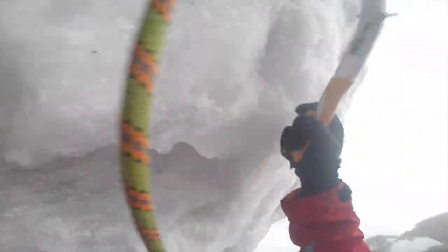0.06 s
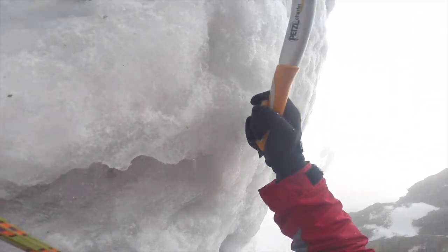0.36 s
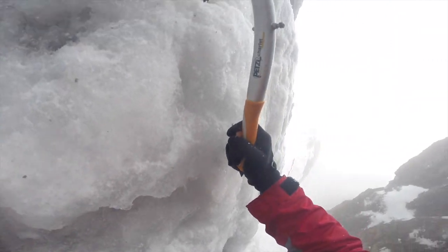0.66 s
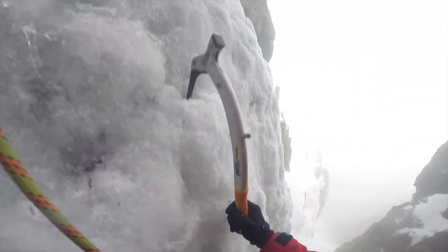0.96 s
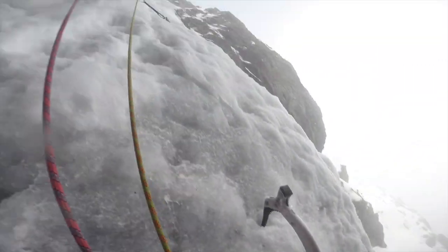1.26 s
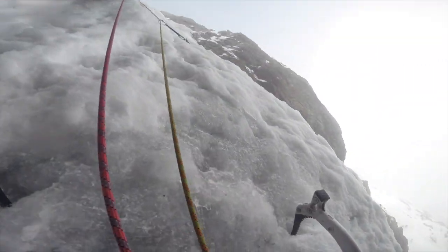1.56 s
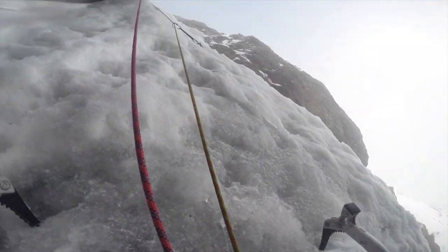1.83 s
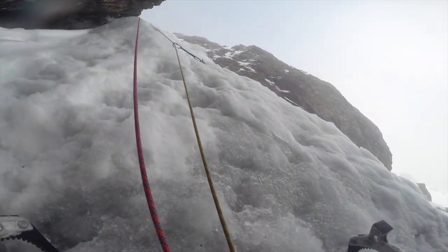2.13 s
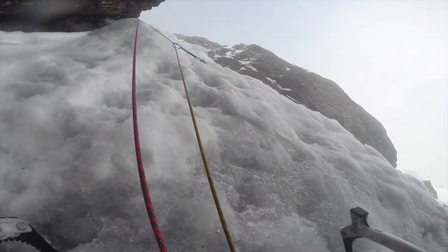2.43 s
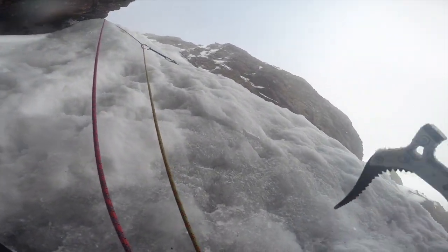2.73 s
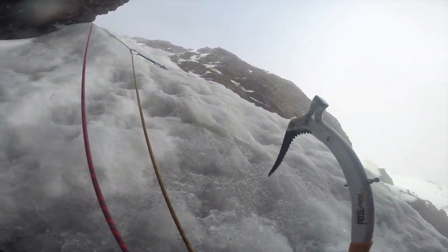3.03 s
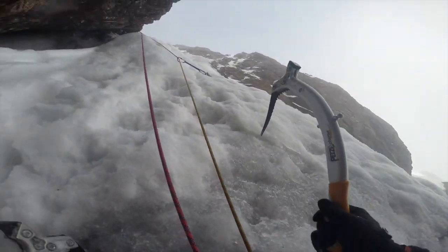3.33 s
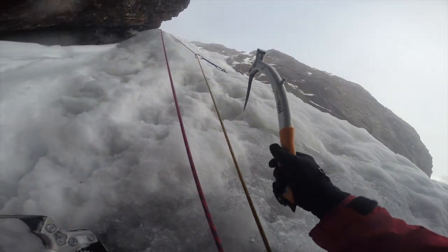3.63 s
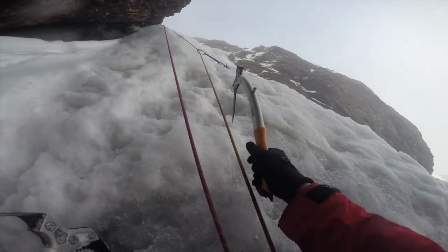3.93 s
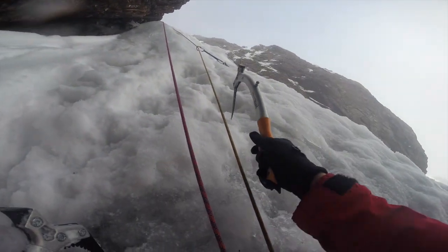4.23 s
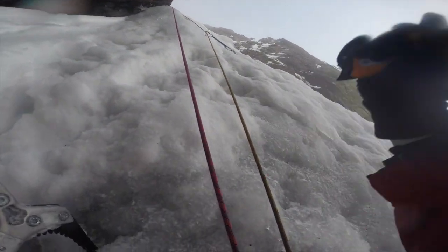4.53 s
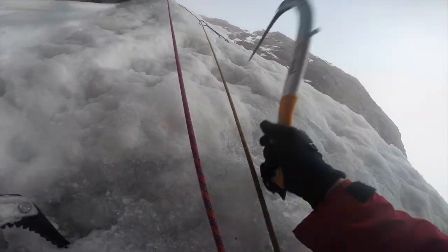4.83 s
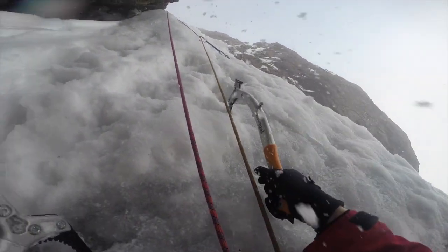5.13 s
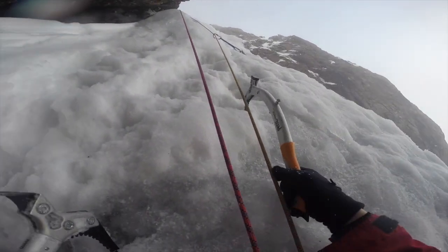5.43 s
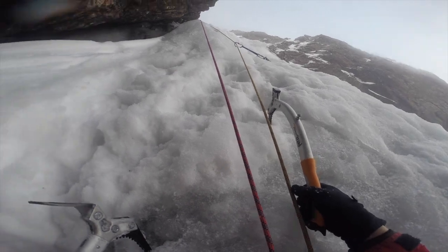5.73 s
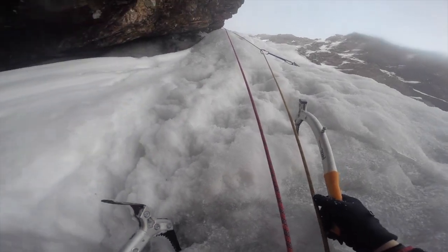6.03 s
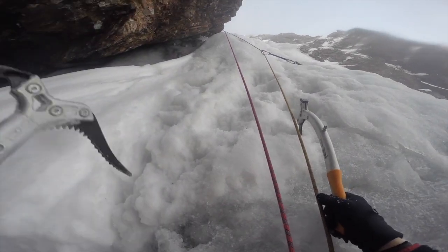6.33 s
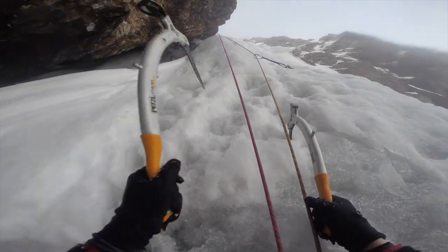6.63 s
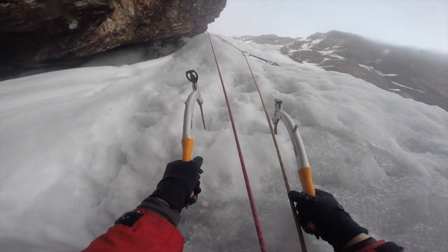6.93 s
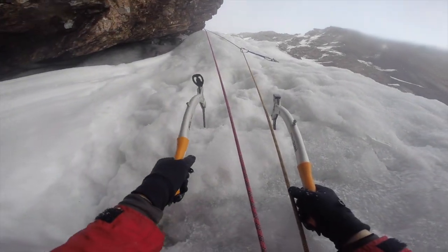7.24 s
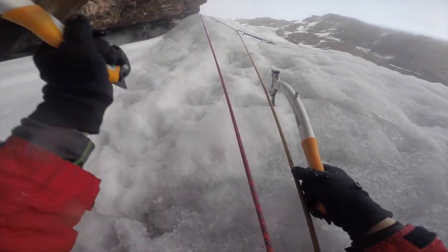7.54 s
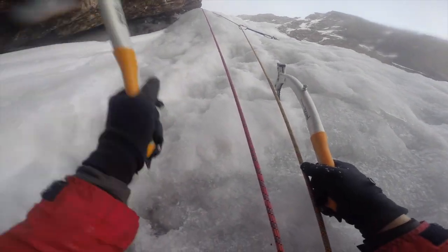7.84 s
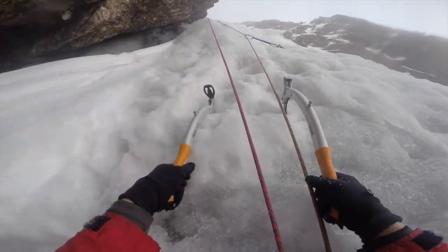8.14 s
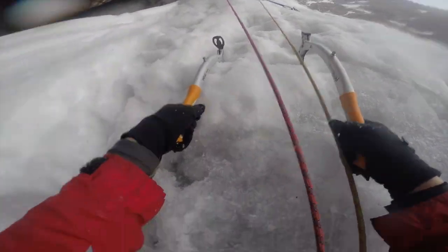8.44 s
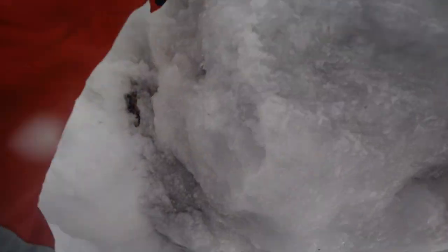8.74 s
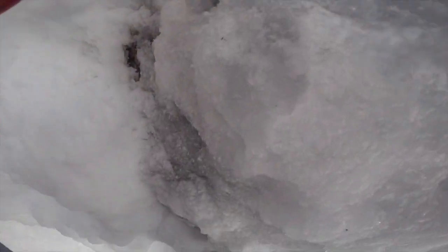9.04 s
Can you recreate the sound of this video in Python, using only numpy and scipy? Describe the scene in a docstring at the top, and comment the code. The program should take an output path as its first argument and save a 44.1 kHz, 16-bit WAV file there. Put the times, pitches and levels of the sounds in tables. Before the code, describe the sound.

An ice climber is heard from a helmet microphone. A loud, deep thump and rustle come first, followed by quieter knocks, rubbing clothes and small metal clinks. An axe pick crunches into the ice, and flying chips crack sharply against the microphone's plastic case. Two more axe strikes follow, the second firmer, with faint sleeve swishes. Low wind rumbles in the open air throughout.

```python
"""First comes a loud thump and rustle, then quieter knocks: an ice climber, heard from a helmet camera.
Axe picks crunch into the wall, and about five seconds in, chips of ice fly back and crack against the
camera's plastic case. The climber's moves knock the camera and sway its mount. Metal gear clinks,
clothes rub and wind rumbles. The camera's automatic volume control starts low and recovers,
then turns everything down again for a moment when the chips hit."""
import sys
import numpy as np
from scipy import signal
from scipy.fft import rfft, irfft
from scipy.io import wavfile

SR = 44100
rng = np.random.default_rng(int(sys.argv[2]) if len(sys.argv) > 2 else 0)


def inscribe(sig):
    """Save sig as 16-bit PCM at rate SR to the path in sys.argv[1].

    A 1-D sig is mono; a 2-D sig holds one channel per row.
    Samples are clipped to [-1, 1] before scaling.
    """
    pcm = np.round(np.clip(np.atleast_2d(sig).T, -1, 1) * 32767)
    wavfile.write(sys.argv[1], SR, pcm.astype(np.int16))


N = 409248

# jolts that sway the camera or boom the helmet: start_s, level_db, pitch_hz, fade_s (to fall 60 dB)
JOLTS = [(0.001, 15, 54, 0.072), (0.029, -10, 120.3, 0.27), (0.037, 6.5, 62, 0.1), (1.376, -16, 28, 0.3),
         (1.418, -11.5, 68, 0.45), (1.466, -6.5, 46.7, 0.21), (1.528, -12.5, 58.6, 0.33),
         (2.31, -26, 65.6, 0.35), (4.37, -34, 70, 0.16), (4.938, -23, 61.4, 0.15),
         (4.965, -19.5, 46.2, 0.18), (6.81, -30, 69.3, .2), (7.978, -18, 30, 0.19),
         (8.015, -22.5, 48.55, 0.27), (8.548, -24, 50.7, 0.17), (8.579, -17, 62, 0.18)]


def axe_picks():
    """Each swing crunches twice, through the crust and then deeper in; between swings the pick scrapes."""
    # swings: start_s, entry_db, entry_s, brightness_hz, sinking_db, sinking_s
    bites = [(4.01, -48, 0.019, 6760, -48.5, .016), (4.917, -22, 0.0095, 5280, -25, .007),
             (6.895, -41, 0.02, 7200, -38.5, 0.028), (7.9392, -31, 0.021, 8500, -26, 0.024)]
    # the pick dragging lightly on the ice: start_s, level_db, length_s
    scrapes = [(4.242, -48.5, 0.077), (6.942, -52.5, 0.054), (7.102, -55, .09), (7.261, -62, 0.074)]
    out = np.zeros(N)
    for start_s, entry_db, entry_s, brightness_hz, sinking_db, sinking_s in bites:
        add(out, start_s, crunch(entry_db, entry_s, brightness_hz))
        add(out, start_s + entry_s, crunch(sinking_db, sinking_s, 0.64 * brightness_hz))  # duller inside
    for start_s, level_db, length_s in scrapes:
        add(out, start_s, crunch(level_db, length_s, brightness_hz=5900))
    return out


def crunch(level_db, length_s, brightness_hz):
    """The pick breaks the ice in a rush of tiny cracks, which dies away once it has stuck."""
    # ringing tones that colour the crunch: pitch_hz, width_hz, level_db
    pick_tones = [(776, 100, -2), (1440, 74, 10.5), (2260, 550, 5.5), (2780, 370, 1.5), (4395, 680, 2.5),
                  (5800, 187, 1.5), (7100, 280, -21.5), (10900, 4000, -16)]
    t = np.arange(SR // 4) / SR
    driving = np.minimum(t / 0.0012, 1) * np.exp(-np.maximum(t - 0.68 * length_s, 0) / 0.0055)
    settling = gain_of(-25) * np.exp(-t / 0.05)
    cracks = rng.standard_normal(len(t)) * random_sizes(len(t), spread_db=5.1)
    push = cut_bass(cut_treble(cracks * (driving + settling), brightness_hz), 650)
    return at_level(ring_body(push, pick_tones, leak_db=-29), level_db)


def ice_chips():
    """Each chip cracks on the case and rings for an instant; fine ice dust ticks in between."""
    # chips landing: start_s, level_db, hardness_hz, crumble_s, ring_hz, ring_db (against the case)
    hits = [(5.153, -43, 5000, 0.0086, 2560, 10), (5.1759, -27, 9000, 0.0012, 1850, -9),
            (5.2086, -9.5, 12000, 0.0015, 6500, -5.5), (5.237, -40, 10000, 0.002, 5550, -15.5),
            (5.2608, -6, 10000, 0.0023, 4510, 11), (5.265, -8.5, 2600, 0.0066, 2050, -2),
            (5.291, -26, 5000, 0.0079, 2090, -4), (5.3072, -17.5, 12000, 0.0025, 5630, -2),
            (5.317, -9.5, 3800, 0.0054, 2130, 2.5), (5.34, -31, 4500, 0.012, 2050, 11),
            (5.376, -9, 2000, 0.0015, 2010, 2.5), (5.381, -20.5, 1700, 0.0041, 2000, 6),
            (5.4045, -40, 14000, 0.0015, 9500, -5), (5.489, -48, 3500, 0.0037, 2900, -5),
            (5.513, -38.5, 7000, 0.0044, 2920, 3), (5.535, -46.5, 3500, 0.003, 2020, 6)]
    # ringing tones of the plastic case: pitch_hz, width_hz, level_db
    case_tones = [(1300, 110, -13.5), (1580, 140, 9), (1830, 160, 1.5), (2020, 110, -6.5), (2670, 48, -1.5),
                  (2880, 170, -0.5), (3230, 220, -1), (4400, 750, -4), (5300, 160, -8.5), (6500, 230, -3.5),
                  (8440, 210, -6.5), (11500, 900, -18.5), (14000, 900, -21.5)]
    # dust flying with the chips: middle_s, length_s, level_db
    dust_cloud = [(5.31, 0.33, -46)]
    out = np.zeros(N)
    for start_s, level_db, hardness_hz, crumble_s, ring_hz, ring_db in hits:
        # a solid chip lands as one clean blow, a slushy one crumbles into many
        blow = contact(hardness_hz, crumble_s, chatter=0.76 * (crumble_s / 0.0022) ** 1.3)
        push = cut_bass(blow, 1200)
        overtone = cut_treble(resonate(push, 2 * ring_hz, width_hz=400), 11000)
        ring = resonate(push, ring_hz, width_hz=280) + gain_of(-9) * overtone
        case = ring_body(push, case_tones, leak_db=-27)
        crack = cut_bass(at_level(case, 0) + at_level(ring, ring_db), 1100)
        shove = at_level(cut_treble(blow, 1000), -24)  # the chip's weight gives a faint low push
        add(out, start_s, at_level(at_level(crack, 0) + shove, level_db))
    specks = cut_bass(tiny_snaps(per_s=750, spread_db=5), 1100)
    dust = normalize(ring_body(specks, case_tones, leak_db=-12.5))
    return out + dust * swells(dust_cloud)


def helmet_knocks():
    """Soft blows reach the camera through the climber and the helmet, whose padding dulls them."""
    # knocks of kicks and gear: start_s, level_db (before a 4 dB lift), hardness_hz, chatter_s
    knocks = [(0.013, -11.5, 1200, 0.0032), (.903, -51, 3520, 0.012), (1.02, -51, 1440, 0.002),
              (1.084, -57, 2000, .004), (1.462, -36.5, 3250, 0.0023), (1.486, -43.5, 1800, 0.0059),
              (1.52, -35.5, 1480, 0.0037), (1.548, -39.5, 2200, 0.0041), (1.673, -42, 1990, 0.0032),
              (2.3, -41.5, 1380, 0.0048), (2.358, -45, 1250, 0.0023), (4.369, -44, 725, 0.0046),
              (5.806, -53, 1500, 0.0015), (6.796, -44.5, 2000, 0.0055), (7.359, -48, 2380, 0.0038),
              (8.004, -39, 760, 0.0016), (8.4, -56, 3520, 0.00078), (8.541, -44.5, 1710, 0.0015),
              (8.595, -35.5, 510, 0.0033), (8.61, -48.5, 1010, 0.0033), (8.918, -56.5, 2200, 0.0019)]
    # ringing tones of helmet and mount: pitch_hz, width_hz, level_db
    helmet_tones = [(176, 60, 9.5), (334, 45, 3), (629, 96, -1.5), (860, 270, -9), (1174, 55, -1.5),
                    (1380, 190, 0.5), (2050, 130, 7), (2950, 260, -33), (5700, 900, -42)]
    out = np.zeros(N)
    for start_s, level_db, hardness_hz, chatter_s in knocks:
        push = cut_treble(contact(hardness_hz, chatter_s, chatter=0.66), 1.34 * hardness_hz)
        add(out, start_s, at_level(ring_body(push, helmet_tones, leak_db=-41), level_db + 4))
    return out


def mount_sway():
    """After a jolt the camera swings to and fro on its mount, making a deep thump."""
    out, t = np.zeros(N), np.arange(SR // 2) / SR
    fade_in = 1 - np.exp(-(t / 0.0051) ** 2)
    for start_s, level_db, pitch_hz, fade_s in JOLTS:
        sway = gain_of(level_db - 60 * t / fade_s) * np.sin(2 * np.pi * pitch_hz * t)
        add(out, start_s, fade_in * sway)
    return out


def gear_clinks():
    """Steel and aluminium touch; each touch brings out the tones near its own pitch."""
    # touches: start_s, level_db, pitch_hz, ring_factor (small when the piece is held)
    touches = [(0.034, -41, 2140, 1.6), (0.186, -56, 9500, 0.7), (2.1875, -38.5, 1950, 0.19),
               (2.591, -42, 3480, 0.57), (4.898, -53, 5800, .3), (4.934, -44, 1900, 1.2),
               (5.956, -58, 4400, .3), (6.238, -62, 3970, 1), (6.269, -50, 2950, 1.6),
               (6.702, -63, 5800, 0.53), (7.036, -60.5, 3450, 0.58), (7.1, -60, 1400, 2.5),
               (7.113, -61.5, 4500, 2.3), (8.027, -59, 5800, 0.86)]
    # tones of the gear: tone_hz, tone_db, fade_s (to fall 60 dB when ring_factor is 1)
    metal_tones = [(1475, -17, 0.23), (1804, 1, 0.08), (1900, -15, 0.081), (2620, 0, 0.071),
                   (2780, -2.5, 0.14), (3360, -8, 0.041), (4470, -15, .16), (4650, -4, 0.068),
                   (5800, -3.5, 0.066), (5950, 4.5, 0.034), (9500, -2, 0.065), (10500, -17, 0.086)]
    out, t = np.zeros(N), np.arange(SR // 5) / SR
    fade_in = 1 - np.exp(-t / 0.0012)
    for start_s, level_db, pitch_hz, ring_factor in touches:
        ring = np.zeros(len(t))
        for tone_hz, tone_db, fade_s in metal_tones:
            octaves_away = abs(np.log2(tone_hz / pitch_hz))
            fading_db = tone_db - 13.4 * octaves_away - 60 * t / (ring_factor * fade_s)
            ring += gain_of(fading_db) * np.sin(2 * np.pi * tone_hz * t)
        tick = resonate(contact(10000, 0.0073, chatter=0.55), pitch_hz, width_hz=pitch_hz / 1.8)
        clink = at_level(ring * fade_in, 0) + at_level(tick, -6.5)
        add(out, start_s, at_level(clink, level_db))
    return out


def clothing():
    """Fabric sticks and slips: hood and straps sound through the case, the jacket through the air."""
    # tone colour of the rubbing and of the swishing: pitch_hz, level_db
    rub_colour = [(100, 7), (300, 4.5), (500, -6.5), (650, -2.5), (980, -10.5), (1180, -2), (1320, -9.5),
                  (1450, 3), (1650, -13), (2020, 0), (2200, 1), (2520, -14.5), (2780, -7), (3200, -15),
                  (14000, -48.5)]
    swish_colour = [(600, -8.5), (1500, 4.5), (3000, 5.5), (3900, -1), (4500, 1), (5100, -2.5), (5700, 1.5),
                    (7500, -12), (10000, -14), (15000, -21)]
    # body shifts and arm reaches: middle_s, length_s, level_db (before the lifts in the last line)
    shifts = [(.01, 0.077, -19.5), (1.22, 1, -61), (1.54, 0.15, -41.5), (1.68, 0.75, -56),
              (2.12, 0.45, -56), (2.39, 0.23, -59), (2.64, 0.18, -58), (2.79, 0.18, -56),
              (2.95, 0.33, -54.5), (3.32, 0.68, -56.5), (3.8, 0.13, -55.5), (4.02, 0.71, -63),
              (4.61, 0.48, -60.5), (4.87, .18, -53.5), (5.06, 0.19, -50.5), (5.55, 0.65, -67),
              (7.44, .22, -67), (8.08, 0.14, -65), (8.58, 0.4, -60.5), (8.95, 1, -70)]
    reaches = [(.024, 0.048, -20), (.75, 0.59, -66), (1.09, 0.18, -64), (1.29, 0.46, -64.5),
               (1.73, 0.27, -66), (2.08, 0.5, -65.5), (2.38, .1, -64.5), (3.3, .25, -73), (4.26, 0.14, -65),
               (4.94, 0.15, -58), (5.54, 0.53, -62.5), (7.03, 0.39, -68), (7.53, 0.23, -67.5),
               (8.1, 0.15, -69.5), (8.44, 0.47, -73.5)]
    rub = coloured(tiny_snaps(per_s=5000, spread_db=1), rub_colour)
    rub = normalize(rub * gain_of(0.96 * wander(per_s=32)))
    swish = coloured(tiny_snaps(per_s=6000, spread_db=0.5), swish_colour)
    swish = normalize(swish * gain_of(1.2 * wander(per_s=30)))
    shifting = swells(shifts)
    reaching = np.hypot(swells(reaches), gain_of(-14) * shifting)  # each shift moves the jacket too
    rub *= np.hypot(shifting, gain_of(-73))  # the clothes are never quite still
    swish *= np.hypot(reaching, gain_of(-70.5))
    return gain_of(5.5) * rub + gain_of(3) * swish


def sleeve_swipes():
    """Nylon sleeves brush the jacket in short, bright swipes as the arm draws back."""
    # swipes: middle_s, level_db
    swipes = [(7.58, -59), (7.635, -60.5), (7.745, -62), (7.79, -59.5), (8.09, -60), (8.135, -62),
              (8.175, -60.5)]
    # tone colour of nylon: pitch_hz, level_db
    nylon_colour = [(2000, -23), (3500, 8), (4300, -9), (5300, 3), (6200, 1), (6700, -2), (7300, 3.5),
                    (8800, -10), (10500, -2), (12000, -14.5), (15000, -10)]
    strokes, length_s = np.zeros(N), 0.06
    for middle_s, level_db in swipes:
        add(strokes, middle_s - length_s / 2, at_level(np.hanning(round(length_s * SR)), level_db))
    return strokes * normalize(coloured(tiny_snaps(per_s=7000, spread_db=1.5), nylon_colour))


def wind():
    """Air swirls around the case with a low rumble: a breeze, a few gusts and a puff at every jolt."""
    # gusts: middle_s, length_s, level_db
    gusts = [(1.05, 0.41, -43), (1.58, 0.36, -31.5), (2.9, 1.9, -45.5), (5.15, .4, -40.5), (8.82, .6, -39)]
    # tone colour of the rumble: pitch_hz, level_db
    rumble_colour = [(12, -9.5), (22, -2), (32, 3), (46, -6), (64, 2), (80, -7), (100, -15), (160, -19.5),
                     (300, -31.5), (700, -41.5), (2000, -76.5)]
    puffs, t = np.zeros(N), np.arange(SR) / SR
    for start_s, level_db, _, fade_s in JOLTS:
        puff = gain_of(level_db - 14.5 - 60 * t / (1.4 * fade_s))  # weaker and longer than the jolt
        add(puffs, start_s, puff * np.minimum(t / 0.013, 1))
    breeze = gain_of(-44.5 + 1.34 * wander(per_s=2.5))
    flutter = gain_of(1.8 * wander(per_s=9))
    rumble = normalize(coloured(rng.standard_normal(N), rumble_colour) * flutter)
    return rumble * np.sqrt(breeze ** 2 + swells(gusts) ** 2 + puffs ** 2)


def background():
    """Open air and the microphone give an even hush; the camera's electronics whine faintly."""
    # tone colour of the hush: pitch_hz, level_db
    hush_colour = [(88, -40.5), (150, -15.5), (258, -5.5), (519, -11.5), (607, -10), (656, -12), (796, -11),
                   (7560, -29), (8830, -29.5), (15500, -40)]
    # tones of the whine: pitch_hz, level_db
    whine_tones = [(8780, -76.5), (11705, -88), (14626, -87.5)]
    t = np.arange(N) / SR
    drift = 0.5 * wander(per_s=12)
    whine = sum(gain_of(db) * np.sqrt(2) * np.sin(2 * np.pi * hz * t + drift) for hz, db in whine_tones)
    hush = normalize(coloured(rng.standard_normal(N), hush_colour))
    return gain_of(-62.5) * hush + whine


def contact(hardness_hz, crumble_s, chatter):
    """One blow, then a chatter of smaller ones that swells as the surfaces crush and dies away."""
    t = np.arange(SR // 5) / SR
    crushing = np.minimum(2 * t / crumble_s, 1) ** 0.5 * np.exp(-(t / crumble_s) ** 1.4)
    small_blows = rng.standard_normal(len(t)) * crushing
    return cut_treble((t == 0) + chatter * small_blows, hardness_hz)


def ring_body(push, tones, leak_db):
    """An object rings with whatever pushes it; a little of the push leaks straight through."""
    ringing = sum(gain_of(db) * resonate(push, hz, width_hz) for hz, width_hz, db in tones)
    return gain_of(leak_db) * push + ringing


def resonate(x, hz, width_hz):
    """Rings at one pitch; a narrower width rings longer."""
    return signal.lfilter(*signal.iirpeak(hz, hz / width_hz, fs=SR), x)


def cut_treble(x, hz):
    """A softer contact lasts longer and loses the treble above hz."""
    return signal.sosfilt(signal.butter(2, min(hz, 0.45 * SR), fs=SR, output="sos"), x)


def cut_bass(x, hz):
    """Small, light things give out little below hz."""
    return signal.sosfilt(signal.butter(3, hz, "high", fs=SR, output="sos"), x)


def coloured(x, colour):
    """Turns each pitch up or down along a curve of (pitch_hz, level_db) points."""
    pitch_hz, level_db = np.transpose(colour)
    all_hz = np.fft.rfftfreq(len(x), 1 / SR)
    curve_db = np.interp(np.log(all_hz + 1), np.log(pitch_hz), level_db)
    return irfft(rfft(x) * gain_of(curve_db), len(x))


def tiny_snaps(per_s, spread_db):
    """A dense, random stream of tiny snaps of unequal size."""
    sizes = random_sizes(N, spread_db)
    return normalize(rng.standard_normal(N) * sizes * (rng.random(N) < per_s / SR))


def random_sizes(count, spread_db):
    """Many small sizes and a few big ones."""
    return gain_of(spread_db * np.minimum(rng.exponential(1, count), 4))


def wander(per_s):
    """A smooth random curve that changes about per_s times a second."""
    all_hz = np.fft.rfftfreq(N, 1 / SR)
    return normalize(irfft(rfft(rng.standard_normal(N)) / (1 + (all_hz / per_s) ** 4), N))


def swells(rows):
    """Each row rises and falls smoothly; overlapping ones add in power."""
    power, t = np.zeros(N), np.arange(N) / SR
    for middle_s, length_s, level_db in rows:
        hump = np.cos(np.pi * np.clip((t - middle_s) / length_s, -0.5, 0.5)) ** 2
        power += (gain_of(level_db) * hump) ** 2
    return np.sqrt(power)


def gain_of(db):
    """Turns decibels into a number to multiply by."""
    return 10 ** (np.asarray(db) / 20)


def normalize(x):
    """Scales a sound to an average power of 1."""
    return x / np.sqrt(np.mean(x ** 2) + 1e-20)


def at_level(x, db):
    """Gives a short sound the energy of 10 ms at this level."""
    return gain_of(db) * x / np.sqrt(np.sum(x ** 2) / (SR / 100) + 1e-20)


def add(mix, start_s, sound):
    """Adds a sound to the mix at start_s."""
    part = mix[max(round(start_s * SR), 0):][:len(sound)]
    part += sound[:len(part)]


def scene():
    """Everything as it arrives at the one microphone."""
    impacts = axe_picks() + ice_chips() + helmet_knocks() + gear_clinks() + mount_sway()
    return (impacts + wind() + clothing() + sleeve_swipes() + background())[None]


def volume_control(x, threshold_db, start_cut_db, recovery_db_per_s):
    """Starts turned down, drops quickly on loud sound above the bass, and comes back slowly."""
    above_bass = signal.sosfilt(signal.butter(2, 400, "high", fs=SR, output="sos"), x)
    memory = np.exp(-1 / (0.0021 * SR))  # reacts in about 2 ms
    smoother = [1 - memory], [1, -memory]
    level_db = 10 * np.log10(signal.lfilter(*smoother, above_bass ** 2) + 1e-12)
    recovered_db = np.arange(N) / SR * recovery_db_per_s
    held_db = np.maximum.accumulate(np.maximum(level_db - threshold_db + recovered_db, start_cut_db))
    cut_db = np.maximum(held_db - recovered_db, 0)
    return x / gain_of(start_cut_db + signal.lfilter(*smoother, cut_db - start_cut_db))


def record(dry):
    """The camera controls the volume, flattens peaks that are still too loud and drops the top treble."""
    controlled = volume_control(dry[0], threshold_db=-16.5, start_cut_db=16.5, recovery_db_per_s=17)
    treble_limit = signal.firwin(511, 15500, window=("kaiser", 8), fs=SR)
    return signal.oaconvolve(np.clip(controlled, -1, 1), treble_limit, "same")[None]


dry = scene()
out = record(dry)
inscribe(out)
```